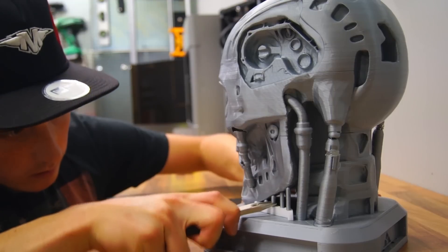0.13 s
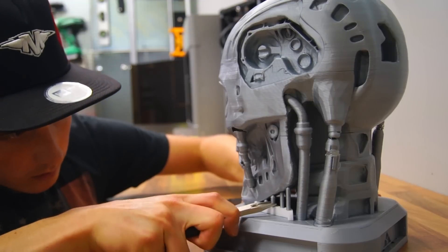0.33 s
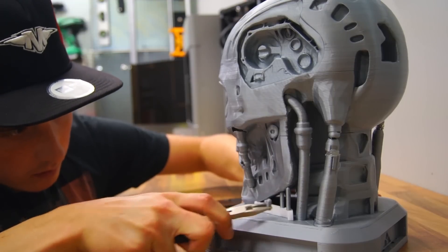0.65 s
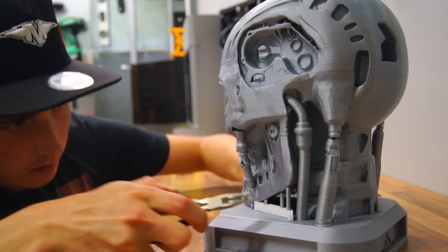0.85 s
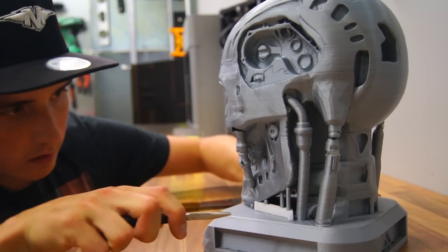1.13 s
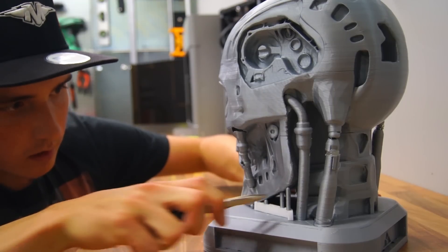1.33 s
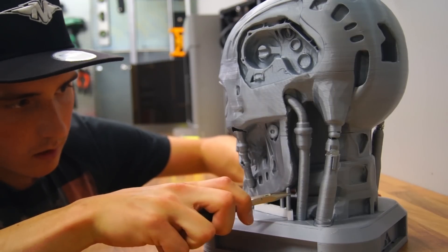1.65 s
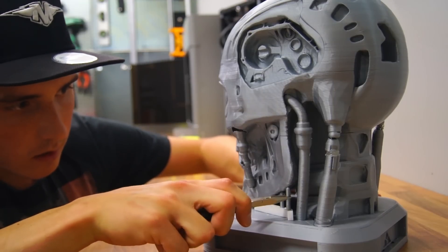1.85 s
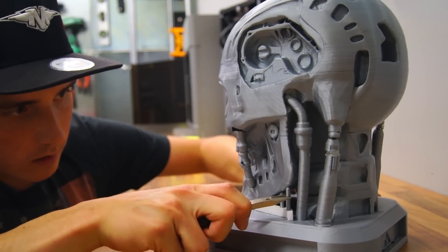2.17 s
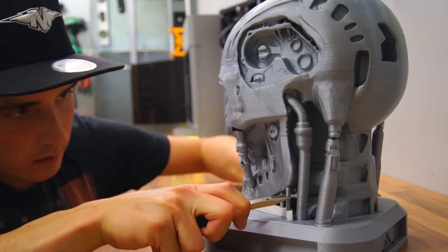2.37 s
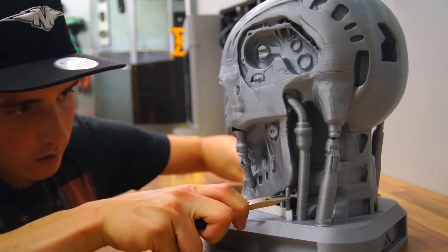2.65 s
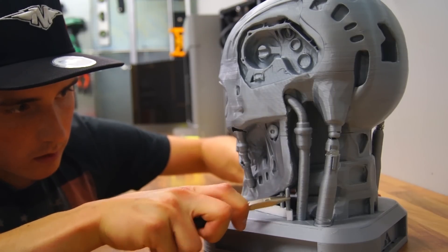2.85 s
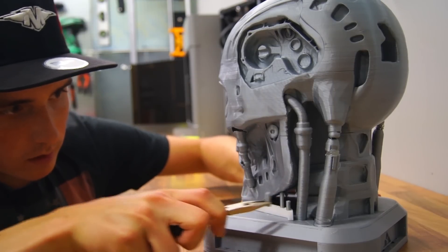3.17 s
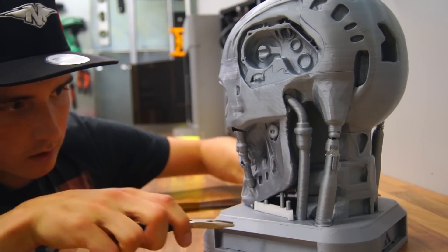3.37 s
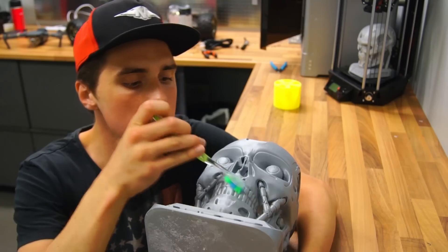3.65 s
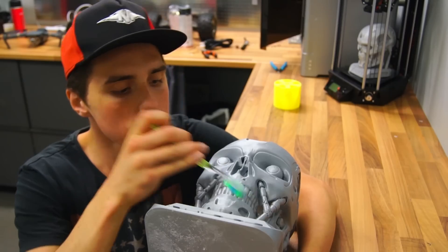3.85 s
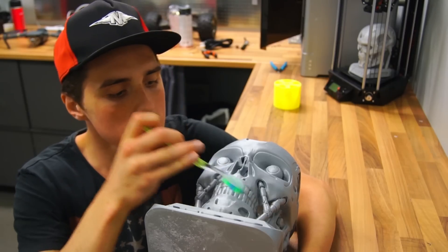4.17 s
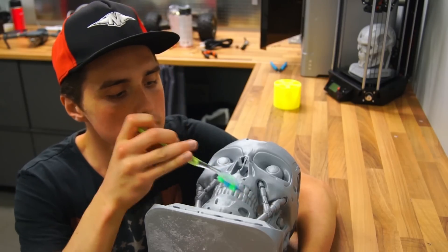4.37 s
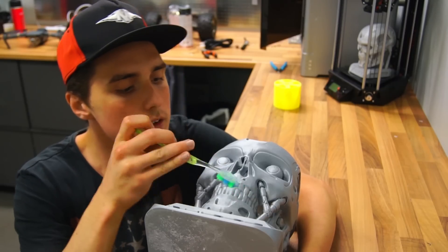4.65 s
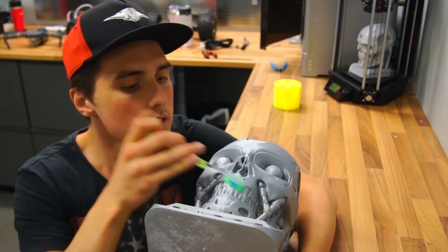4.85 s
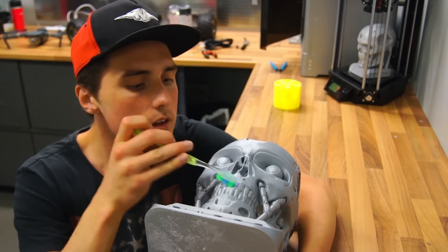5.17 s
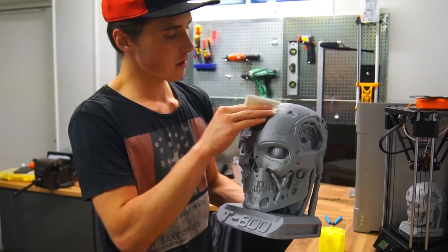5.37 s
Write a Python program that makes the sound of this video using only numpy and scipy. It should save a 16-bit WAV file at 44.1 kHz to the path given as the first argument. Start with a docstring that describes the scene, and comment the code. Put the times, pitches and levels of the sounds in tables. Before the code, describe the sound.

Pliers snap plastic struts off a hollow printed part with sharp cracks, bits rattle on a bench, then a stiff brush scrubs rhythmically.

```python
"""Workshop bench, pliers and brush

Pliers snap plastic struts off a hollow printed bust: each snap is a crack with short rings.
Steel jaws chatter and scrape, broken bits tick on the bench, and the part drags and knocks on the wood.
Then a stiff brush scrubs in swells of noise; at the very end a wider, duller hand sanding begins.
A bare room answers with fading noise; the microphone is nearly mono and hisses faintly."""
import sys
import numpy as np
from scipy import signal
from scipy.fft import rfft, irfft, next_fast_len
from scipy.io import wavfile
from scipy.ndimage import uniform_filter1d, map_coordinates

SR = 44100
rng = np.random.default_rng(int(sys.argv[2]) if len(sys.argv) > 2 else 0)


def pcm_store(signal):
    """Save signal as 16-bit PCM."""
    levels = np.round(np.clip(np.atleast_2d(signal), -1, 1) * 32767)
    wavfile.write(sys.argv[1], SR, levels.astype(np.int16).T)


N = 242991

# In the tables, a fade time is the time in seconds to fall by 60 dB.
# Faint steady tones. Each row: frequency in Hz, peak level in dB.
STEADY_TONES = [(142, -71), (15625, -88)]
# Colour of the microphone hiss. Each row: frequency in Hz, relative level in dB.
HISS_COLOUR = [(15, -47), (25, -8), (247, -2), (333, -6), (498, -4.5), (926, -3.5), (1090, -3.5),
               (3120, -5.5), (7380, -11.5), (15700, -15.5)]
# Colour of the noise that differs between the channels. Each row: frequency in Hz, relative level in dB.
SIDE_HISS_COLOUR = [(25, 17), (850, -3), (2500, -18), (5000, -11), (15700, 0.5)]
# Colour of the extra width in the sanding scene. Each row: frequency in Hz, relative level in dB.
WIDE_COLOUR = [(59, -58), (100, -26), (1320, -16), (2660, -18), (3150, 0), (3570, -19), (15700, -39)]
# How long the room rings. Each row: frequency in Hz, fade time in seconds.
ROOM_FADE = [(100, 0.54), (260, 0.49), (700, 0.55), (1840, 0.67), (4850, 0.73), (9000, 0.51), (15000, 0.31)]
# Colour of the echo; treble mostly beams past the walls. Each row: frequency in Hz, relative level in dB.
WALL_COLOUR = [(300, 2.5), (3500, 2), (6000, -4), (15000, -3.5)]
# Resonances of the hollow part. Each row: centre in Hz, width in Hz, boost in dB.
SHELL_RESONANCES = [(692, 12.4, 8), (1080, 200, 0), (2340, 200, 1), (3170, 590, 4.5), (5675, 270, 7.5),
                    (8860, 100, 0), (10330, 1100, 2.5)]
# Ringing tones of the wooden bench. Each row: pitch in Hz, relative level in dB, fade time in seconds.
BENCH_TONES = [(155.4, -10, 0.29), (264, -21, 0.4), (303, 1, 0.092), (383, -5.5, 0.077),
               (453.6, -6.5, 0.19), (636, -14, 0.17), (711, -20, 0.27), (953, -35, 0.12), (1210, -6, 0.017)]
# Drags and scrapes: first the plier jaws scrape, later the part drags on the wood. Each row: loudest moment
# in seconds, level in dB, rise in seconds, fall in seconds, scratch level in dB against the rub.
SCRAPES = [(0.642, -35, 0.029, 0.068, -2.5), (0.678, -37, 0.053, 0.051, 7),
           (1.702, -28, 0.0062, 0.039, -10.5), (1.865, -43.5, 0.12, 0.068, -12),
           (1.93, -33.5, 0.025, 0.067, -13), (2.04, -49, 0.085, .1, -30)]
# Colour of the dragging rub. Each row: frequency in Hz, relative level in dB.
DRAG_COLOUR = [(60, -35), (150, 10), (320, -1), (800, -0.5), (2000, -0.5), (3000, 2.5), (4500, -30)]
# Colour of the scratching. Each row: frequency in Hz, relative level in dB.
SCRATCH_COLOUR = [(2500, -37), (4500, 6.5), (8500, 13), (11000, -18), (15500, -16)]
# The base lands on the bench. Each row: start in seconds, level in dB, crack in dB against that level.
LANDINGS = [(1.697, -18, 1), (1.94, -16.5, -7), (2.003, -32, 4.5)]
# Loose bits tick on the bench and the part. Each row: start in seconds, level in dB,
# treble tilt in dB per octave (held between -9 and 6), ring in dB against the level.
BIT_TICKS = [(0.0273, -30, 10, 5), (0.085, -24, 6, -8), (1.0796, -35.5, 0, 0), (1.1729, -34, -9, 5),
             (1.3165, -11, -4, 6), (1.3328, -29, -6, 4), (1.399, -21.5, 0, 12), (1.4211, -9.5, 1, 0.5),
             (1.4364, -30, -5, 6), (1.472, -26.5, -4, 8.5), (1.506, -10, 3, 0), (1.5219, -16.5, 5, 2),
             (1.573, -26, -1, 5), (1.5856, -17.5, 0, -0.5), (1.5901, -12, 0, -7), (1.6234, -25, 0, 0),
             (1.6344, -35, 3, -4), (1.653, -20.5, -1, 2), (1.6872, -19, 0.5, -4), (1.7124, -30, 2, 2),
             (1.729, -27, -5, 2), (1.744, -32, -1.5, 3), (2.328, -47, -3, 6), (2.492, -42, -7, 6),
             (3.4037, -38.5, -5, 0)]
# Ring of one loose bit. Each row: pitch in Hz, width as a share of the pitch, relative level in dB.
BIT_TONES = [(1500, 1, -33), (3330, 0.49, -10.5), (8100, 0.031, -21.5)]
# Steel jaws of the pliers touch. Each row: start in seconds, level in dB.
JAW_TOUCHES = [(0.5958, -32), (0.617, -25.5), (0.639, -14.5), (0.6444, -14.5), (0.6537, -10.5),
               (0.6655, -20), (0.6759, -10), (0.689, -31)]
# Ringing tones of the steel. Each row: pitch in Hz, relative level in dB, fade time in seconds.
STEEL_TONES = [(2090, -10.5, 0.023), (2688, -12, 0.051), (5610, -3, 0.014), (5950, -7, 0.015),
               (7700, 1, 0.011), (9000, 0.5, 0.006), (10000, -1, 0.013), (13000, 3.5, .004)]
# Brush strokes, push and pull in turn. Each row: loudest moment in seconds, level in dB, rise in seconds,
# fall in seconds, bristle tips in dB and body in dB, both against the level.
STROKES = [(3.579, -34, 0.075, .1, -1.5, -13.5), (3.676, -33, 0.045, 0.078, -1, -23),
           (3.828, -34, 0.08, 0.11, -3.5, -16), (3.946, -35, 0.072, 0.1, -1.5, -17),
           (4.076, -28.5, 0.04, 0.063, -7, -13.5), (4.175, -37, .055, 0.1, -1.5, -19),
           (4.333, -30.5, 0.06, 0.095, -3, -22), (4.438, -35, 0.095, 0.11, -3, -19.5),
           (4.58, -29, 0.051, 0.093, -2.7, -17.5), (4.676, -36.5, 0.076, .16, -2, -20),
           (4.856, -30, .055, 0.057, -1.7, -24), (4.945, -35.5, 0.06, 0.12, -2.5, -15),
           (5.1, -34, 0.057, 0.091, 1, -18.5), (5.182, -36, 0.065, 0.13, -3, -20),
           (5.366, -32.5, .065, 0.082, 1, -19.5), (5.435, -36.5, .06, 0.11, -1.5, -12)]
# Colour of the scrubbing. Each row: frequency in Hz, relative level in dB.
SCRUB_COLOUR = [(24, -52), (40, -12), (280, -10.5), (606, -15.5), (686, -6), (838, -11.5), (998, -2.5),
                (1600, -5.5), (2990, -2.5), (3840, -5.5), (5720, -6.5), (6320, -7.5), (15500, -19.5)]
# Struts break, some in several steps. Each row: start in seconds, level in dB, body in dB, strut pitch in Hz,
# its width as a share of the pitch, strut in dB, treble tilt in dB per octave (held between -9 and 6),
# bench in dB, room in dB. Body, strut, bench and room are set against the level.
STRUT_SNAPS = [(0.0457, -1.5, -34.5, 2796, 0.024, -24.5, 6, -41, -9),
               (0.2524, -3.5, -8.5, 2865, 0.056, -10, 18, -20, -5),
               (1.1763, -0.5, -35.5, 3220, 0.29, -13.5, 0, -54, -12),
               (2.6583, 1, -24, 4070, 0.16, -9.5, 7, -29, -5.5),
               (2.663, -3, -47, 3320, 0.15, -15, 1, -42, 4),
               (2.6714, -12.5, -43, 3420, 0.12, -17, -3, -32, 4),
               (2.9313, 0, -25.5, 2410, 0.21, -13.5, 3, -29, -6),
               (2.9408, -7.5, -35, 2880, .25, -7, -2, -34, -21),
               (2.9504, -5, -14, 2900, 0.44, -16.5, -5, -22.5, -8),
               (2.9584, 1, -15.5, 2510, 0.34, -16, -2, -33.5, -8.5),
               (2.979, -10, -7, 3600, 0.28, -4.5, -8, -40, -13.5),
               (3.477, -5, -30.5, 3160, .3, -5.5, -6.5, -52, -30)]

BRUSH_START_S = 3.484  # earlier echoes stop here and the brushing begins
SANDING_START_S = 5.443  # from here the next scene begins: wider, duller hand sanding
STEADY_TOP_HZ, TOP_HZ = 15750, 17000  # upper limits: steady noise, rubbing and echo; everything
ECHO_SAMPLES = SR * 9 // 10
HIT_TIME = np.arange(SR // 4) / SR  # seconds within one short hit
TIME = np.arange(N) / SR  # seconds within the whole sound
HISS_DB = -58.5
TICK_ROOM_DB = -10.5
JAW_RING_DB, JAW_ROOM_DB = -5.5, -9.5
TIPS_SWING, BODY_SWING = 1.25, 1  # how steeply treble and body follow a stroke; the main rub has 1
RUB_REST_DB, TIPS_REST_DB, BODY_REST_DB = -46.5, -49, -57.5  # the rubbing never quite stops
SANDING_TREBLE_DB = -12  # the sanding has less treble than the brush
BODY_HZ = 1074
OVERTONE, OVERTONE_DB = 2.09, -7  # a strut's second ring: pitch ratio and level over its first


def amp(db):
    """Turns decibels into a plain multiplier."""
    return 10 ** (np.asarray(db) / 20)


def unit(x):
    """Scales a signal to an average (rms) level of 1."""
    return x / np.sqrt(np.mean(x ** 2) + 1e-20)


def along(points, hz):
    """Reads a curve of (Hz, value) points, spaced as the ear hears pitch."""
    f, v = np.transpose(points)
    return np.interp(np.log(hz + 1), np.log(f + 1), v)


def filtered(x, response):
    """Colours a signal by a gain for each frequency."""
    n = x.shape[-1]
    padded = next_fast_len(n + 8192)
    spectrum = rfft(x, padded) * response(np.fft.rfftfreq(padded, 1 / SR))
    return irfft(spectrum, padded)[..., :n]


def band(hz, width):
    """One resonance; its width is a share of its pitch."""
    return lambda f: 1j * f * width * hz / (hz * hz - f * f + 1j * f * width * hz)


def hollow(f):
    """The hollow part boosts sound near each of its resonances."""
    boost_db = sum(db / (1 + (2 * (f - centre) / width) ** 2) for centre, width, db in SHELL_RESONANCES)
    return amp(boost_db)


def burst(tone, t60, db):
    """Gives a spike with a dying noise rattle, then a plain pulse with the rattle's colour and energy."""
    pulse = filtered(1. * (HIT_TIME == 0), tone)
    pulse = pulse / np.linalg.norm(pulse)
    fall = amp(db - 60 * HIT_TIME / t60)
    rattle = unit(filtered(rng.standard_normal(len(HIT_TIME)), tone)) * fall
    return np.array([rattle + 3 * amp(db) * pulse, np.linalg.norm(fall) * pulse])


def crack(t60, tilt_db):
    """A sharp break through the hollow part, tilted about 4 kHz, thin in the bass and at the very top."""
    def colour(f):
        octaves = np.log2(np.clip(f, 1000, 12000) / 4000)
        tilt = amp(np.clip(tilt_db, -9, 6) * octaves)
        ends = (1j * f / (900 + 1j * f)) ** 2 / (1 + (f / 15500) ** 8)
        return tilt * ends * hollow(f)
    return burst(colour, t60, db=-7)


def ring(modes, scatter_db, detune):
    """A struck object sings in fading tones; strengths and pitches vary a little each time."""
    total = np.zeros(len(HIT_TIME))
    for hz, db, t60 in modes:
        fall = amp(db + scatter_db * rng.standard_normal() - 60 * HIT_TIME / t60)
        onset = 1 - np.exp(-HIT_TIME * hz * 2)
        pitch = hz * (1 + detune * rng.standard_normal())
        total += fall * onset * np.sin(2 * np.pi * pitch * HIT_TIME)
    return total


def grit(rate, spread_db, spectrum, smooth):
    """Rubbing: tiny slips of uneven size, rate per second on average, on a smooth noise."""
    happens = rng.random(N) < rate / SR
    slips = happens * amp(spread_db * rng.standard_normal(N)) * rng.standard_normal(N)
    rub = unit(slips) + smooth * rng.standard_normal(N)
    return filtered(rub, lambda f: amp(along(spectrum, f)) * (f < STEADY_TOP_HZ))


def patchy(x, depth_db):
    """Makes random patches of time and pitch louder or softer."""
    z = signal.stft(x, nperseg=256)[2]
    field = uniform_filter1d(rng.standard_normal(z.shape), size=5, axis=0)  # smooth over pitch
    field = uniform_filter1d(field, size=12, axis=1)  # smooth over time
    return signal.istft(z * amp(depth_db * unit(field)), nperseg=256)[1][:N]


def swells(rows, roundness, swing, column=None):
    """Gain that swells: 20 dB times swing down at a rise before or a fall after each top."""
    rows = np.array(rows)[:, :, None]
    top_s, db, rise, fall = rows[:, 0], rows[:, 1], rows[:, 2], rows[:, 3]
    away = np.abs(TIME - top_s) / np.where(TIME < top_s, rise, fall)
    extra_db = rows[:, column] if column else 0  # a chosen column adds to each swell's level
    level_db = db - 20 * swing * away ** roundness + extra_db
    return np.sqrt(np.sum(amp(level_db) ** 2, axis=0))


def echo(x):
    """The bare room answers with a fresh noise tail; each frequency dies at its own speed."""
    hz, t, z = signal.stft(rng.standard_normal(ECHO_SAMPLES), SR, nperseg=256)
    rise = 1 - np.exp(-t / 0.0021)  # the first walls take a moment
    fade = amp(-60 * t / along(ROOM_FADE, hz)[:, None])
    colour = amp(along(WALL_COLOUR, hz)) * (hz < STEADY_TOP_HZ)
    tail = signal.istft(z * rise * fade * colour[:, None], SR, nperseg=256)[1]
    return signal.fftconvolve(x, tail / np.linalg.norm(tail))


def add(track, s, hit, room_db):
    """Places a hit and its echo; the echo is fed by a plain pulse with the hit's colour and energy."""
    sound, plain = hit
    wet = amp(room_db) * echo(plain)
    wet[:len(sound)] += sound
    start = round(s * SR)
    wet = wet[:round(BRUSH_START_S * SR) - start]
    track[start:start + len(wet)] += wet


def steady(spectrum, db):
    """Even noise of a chosen colour and average level."""
    noise = rng.standard_normal(N)
    return amp(db) * unit(filtered(noise, lambda f: amp(along(spectrum, f)) * (f < STEADY_TOP_HZ)))


def floor():
    """Background: microphone hiss as even noise, and two faint tones as sine waves."""
    tones = sum(amp(db) * np.sin(2 * np.pi * hz * TIME) for hz, db in STEADY_TONES)
    return steady(HISS_COLOUR, HISS_DB) + tones


def scrapes():
    """Drags and scrapes, many tiny slips: first the plier jaws scrape, later the part drags on the wood."""
    rub = unit(grit(rate=300, spread_db=4, spectrum=DRAG_COLOUR, smooth=1.0))
    scratch = unit(grit(rate=1200, spread_db=4, spectrum=SCRATCH_COLOUR, smooth=0.7))
    rub_gain = swells(SCRAPES, roundness=0.84, swing=1)
    scratch_gain = swells(SCRAPES, roundness=0.73, swing=0.98, column=4)
    dry = rub_gain * rub + scratch_gain * scratch
    return dry + amp(-17) * echo(dry)[:N]


def knocks(track):
    """The heavy part lands on the bench top: the wood rings and rattles, with a crack on contact."""
    for s, db, crack_db in LANDINGS:
        bench = amp(-6.0) * ring(BENCH_TONES, scatter_db=6.0, detune=0.0033)
        rattle = burst(band(620, width=1.0), t60=0.061, db=-24.5)
        contact = amp(crack_db) * crack(0.018, tilt_db=-9)
        add(track, s, amp(db) * (bench + rattle + contact), room_db=-11.5)


def ticks(track):
    """A loose bit lands: a small crack and its own brief ring."""
    for s, db, tilt_db, ring_db in BIT_TICKS:
        bit = sum(burst(band(hz, width), t60=0.016, db=level) for hz, width, level in BIT_TONES)
        contact = crack(0.005, tilt_db)
        add(track, s, amp(db) * (contact + amp(ring_db) * bit), TICK_ROOM_DB)


def jaws(track):
    """Steel on steel: a bright tick and a brief ring that shifts with the grip."""
    for s, db in JAW_TOUCHES:
        contact = crack(0.006, tilt_db=3)
        steel = amp(JAW_RING_DB) * ring(STEEL_TONES, scatter_db=3.0, detune=0.028)
        add(track, s, amp(db) * (contact + steel), JAW_ROOM_DB)


def brush_and_sanding():
    """Bristles flick over ridges, tips hiss and the push shakes the body; the same rub, duller, is sanding."""
    rub = grit(rate=6000, spread_db=2.5, spectrum=SCRUB_COLOUR, smooth=1.3)
    rub = filtered(rub, hollow)
    rub = patchy(rub, depth_db=2.0)  # each tuft meets other ridges

    def above(f, hz):  # passes what lies above hz
        return 1 / (1 + (hz / (f + 1)) ** 6)

    body = unit(filtered(rub, lambda f: 1 - above(f, hz=640)))
    middle = unit(filtered(rub, lambda f: above(f, hz=570) - above(f, hz=4540)))
    treble = unit(filtered(rub, lambda f: above(f, hz=5000)))
    treble = treble * amp(SANDING_TREBLE_DB * (TIME > SANDING_START_S))

    def press(rest_db, swing, column):  # stroke loudness over a resting level
        return np.hypot(amp(rest_db), swells(STROKES, 1.53, swing, column))

    strokes = (press(RUB_REST_DB, 1, column=None) * middle
               + press(TIPS_REST_DB, TIPS_SWING, column=4) * treble
               + press(BODY_REST_DB, BODY_SWING, column=5) * body)
    # bristle tufts catch and let go: a new random level every 600 samples, joined smoothly
    flutter = map_coordinates(rng.standard_normal(N // 600 + 4), [np.arange(N) / 600])
    dry = (TIME > BRUSH_START_S) * amp(1.38 * flutter) * strokes
    return dry + amp(-11.5) * echo(dry)[:N]


def snaps(track):
    """A strut breaks: a crack, a dull rattle of the body, a brief strut ring, a push into the bench."""
    for s, db, body_db, strut_hz, width, strut_db, tilt_db, bench_db, room_db in STRUT_SNAPS:
        body = burst(band(BODY_HZ, width=1.0), t60=0.043, db=body_db)
        strut = burst(band(strut_hz, width), t60=0.014, db=strut_db)
        overtone = burst(band(OVERTONE * strut_hz, width), t60=0.004, db=strut_db + OVERTONE_DB)
        bench = amp(bench_db) * ring(BENCH_TONES, scatter_db=0.5, detune=0.017)
        snap = crack(0.0065, tilt_db)
        add(track, s, amp(db) * (snap + body + strut + overtone + bench), room_db)


def scene():
    """All sources sit in the middle; only faint noise, stronger in the sanding scene, gives width."""
    track = np.zeros(N)
    snaps(track)
    ticks(track)
    jaws(track)
    knocks(track)
    middle = track + scrapes() + brush_and_sanding() + floor()
    sanding_width = steady(WIDE_COLOUR, db=-44) * (TIME > SANDING_START_S)
    side = steady(SIDE_HISS_COLOUR, db=-76.5) + sanding_width
    return np.array([middle + side, middle - side])


def record(dry):
    """Loud peaks are rounded off; the deep bass is thin and nothing passes above the top limit."""
    soft = dry / (1 + np.abs(dry / 0.7) ** 6) ** (1 / 6)
    return filtered(soft, lambda hz: (hz < TOP_HZ) * 1j * hz / (90 + 1j * hz))


dry = scene()
out = record(dry)
pcm_store(out)
```